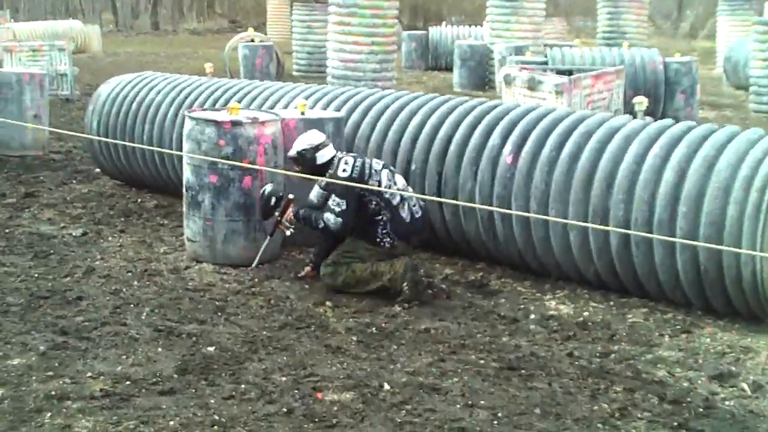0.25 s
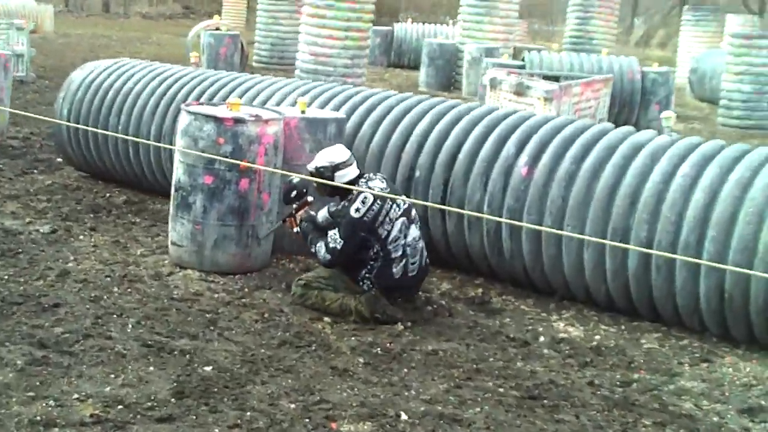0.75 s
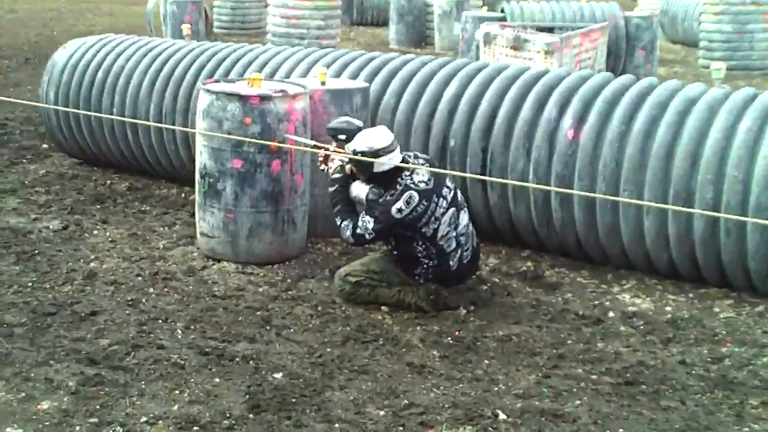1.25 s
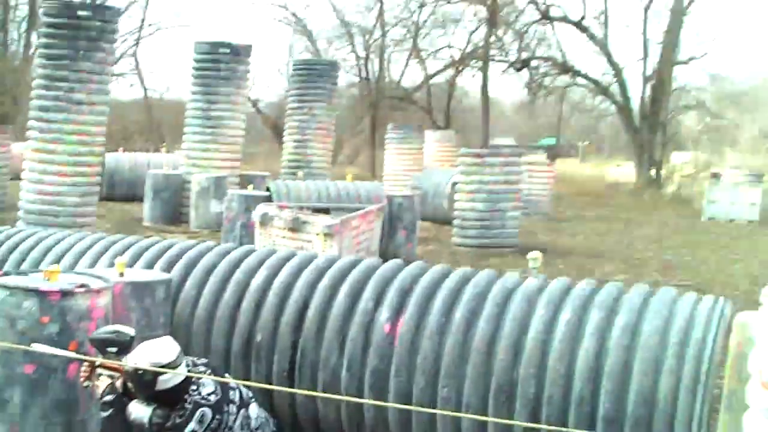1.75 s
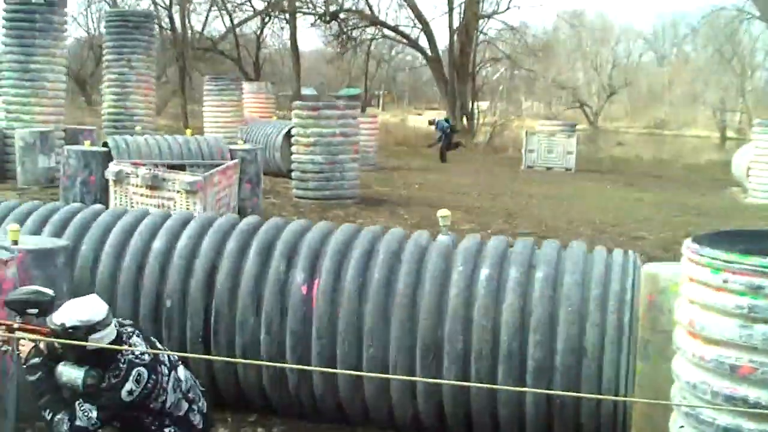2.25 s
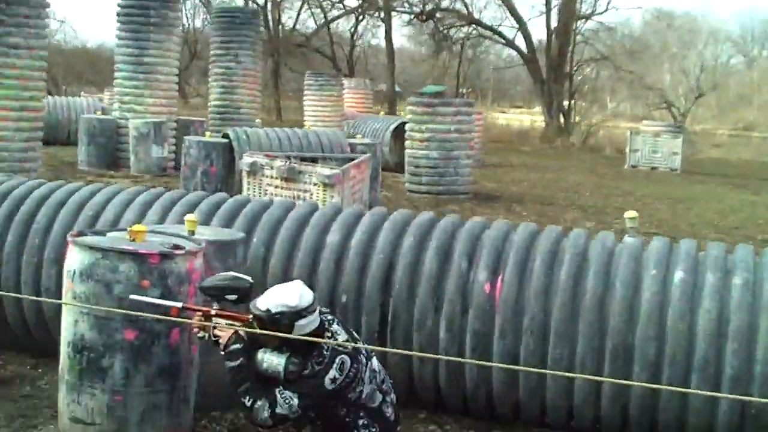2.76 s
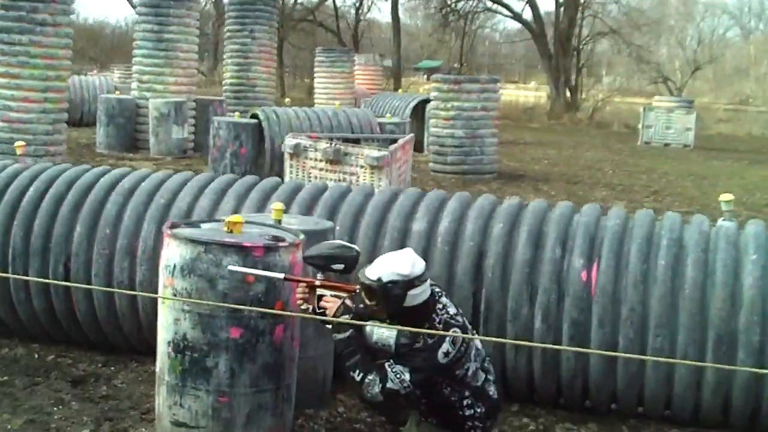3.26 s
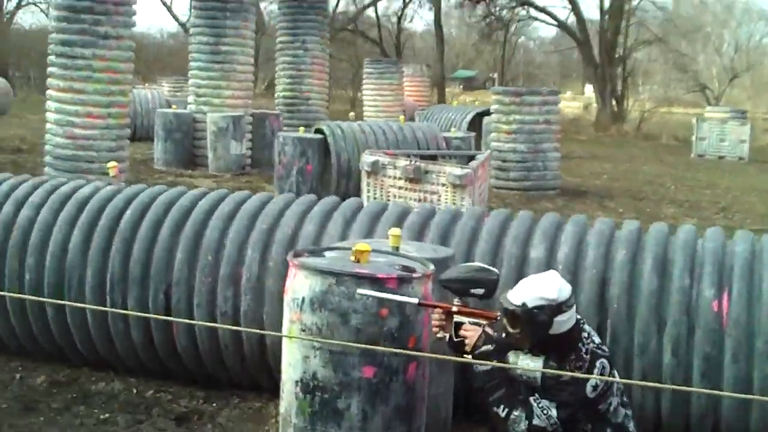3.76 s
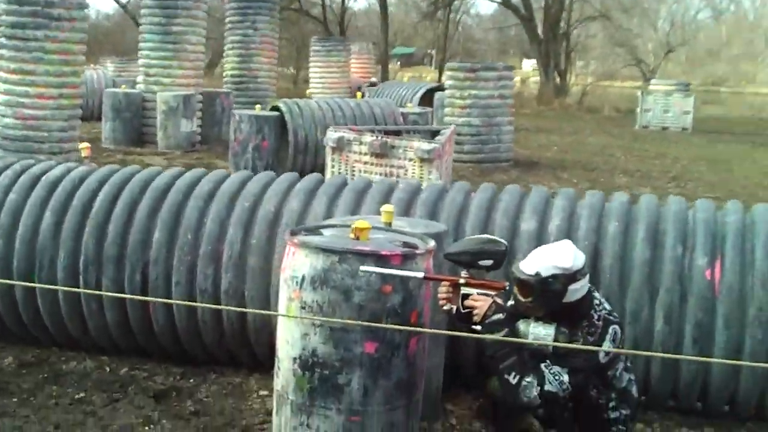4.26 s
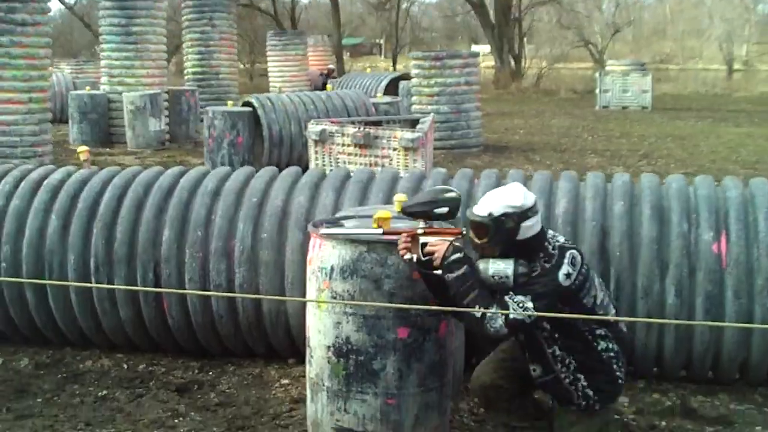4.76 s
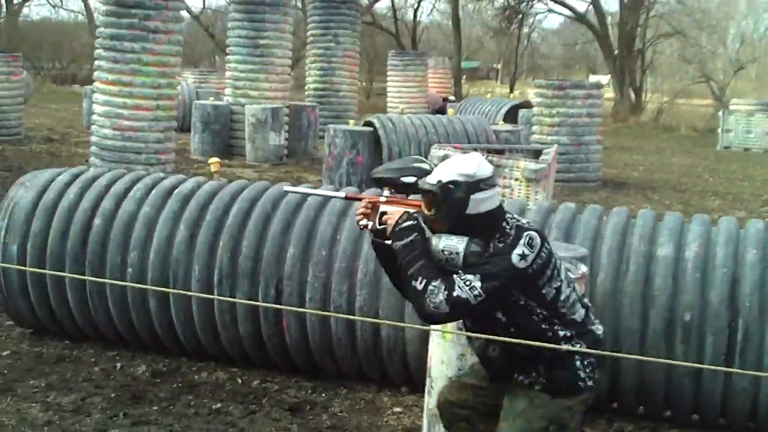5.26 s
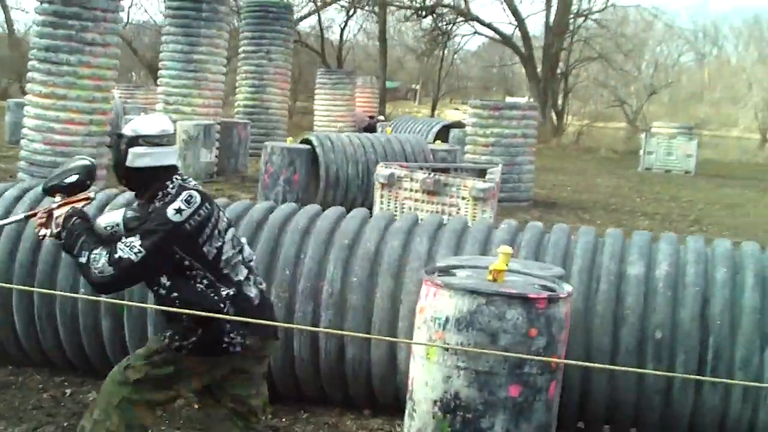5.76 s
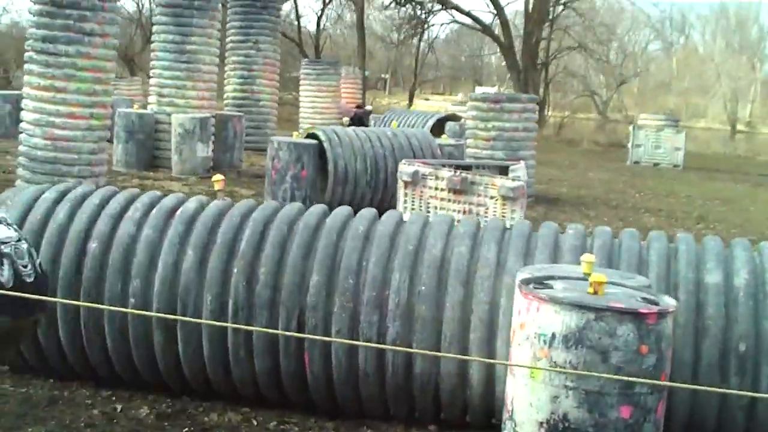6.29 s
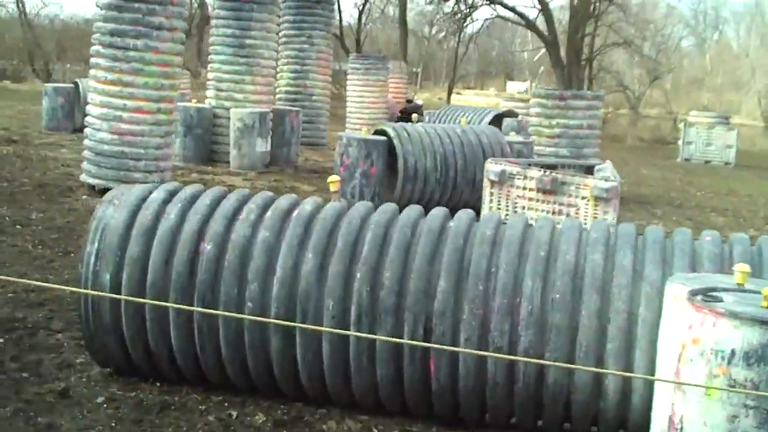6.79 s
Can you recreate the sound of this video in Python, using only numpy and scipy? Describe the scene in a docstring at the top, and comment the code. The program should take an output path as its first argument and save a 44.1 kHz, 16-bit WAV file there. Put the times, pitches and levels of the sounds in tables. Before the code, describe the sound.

Paintball markers crack outdoors in rapid bursts, near and far, with balls splatting on hollow plastic pipe over rustling, light wind and distant engine drone.

```python
"""A paintball marker fires bursts a few metres away: hammer click, blast pulse, ringing cavities, venting gas.
A second marker answers across the field as low swings with short noise cracks; balls burst as wet noise,
two of them on a ribbed plastic pipe that rings in modes. Trees scatter each bang as sparse, decaying returns.
Behind lie rustle, airy hiss and light wind as coloured noise, and a distant engine's wandering tones.
A small camera microphone adds hum, a gain control, a dull top and overload on peaks."""
import sys
import numpy as np
from scipy import signal
from scipy.io import wavfile
from scipy.ndimage import uniform_filter1d

SR = 44100
rng = np.random.default_rng(int(sys.argv[2]) if len(sys.argv) > 2 else 0)


def field_ratio(decibels):
    """Amplitude ratio for a level in dB (20 dB per decade); scalars and array-likes work."""
    return 10 ** (np.asarray(decibels, dtype=float) / 20)


def to_wav(sig):
    """Store sig (one row per channel, or 1-D mono) as 16-bit WAV at the path in sys.argv[1].

    Samples outside -1..1 are clipped; the rate is SR.
    """
    pcm = np.clip(np.atleast_2d(sig), -1, 1) * 32767
    pcm = np.round(pcm).astype(np.int16)
    wavfile.write(sys.argv[1], SR, pcm.T)  # frames by channels


N = 310023  # samples, about 7.03 s


def read(points, hz):
    """Spectral interpolation: levels joined on a log-frequency axis."""
    f, value = np.transpose(points)
    return np.interp(np.log(hz + 1), np.log(f + 1), value)


def evened(x):
    """Normalisation: scaled to rms 1."""
    return x / np.sqrt(np.mean(x ** 2) + 1e-20)


def follow(curve):
    """Envelope: the gain of a dB curve at every sample."""
    return field_ratio(np.interp(np.arange(N) / SR, *np.transpose(curve)))


def add(mix, s, sound):
    """Superposition: mixes a sound in at s seconds."""
    part = mix[max(round(s * SR), 0):][:len(sound)]
    part += sound[:len(part)]


def coloured(spectrum, size, patchy_db=0):
    """Spectral shaping: noise of rms 1 with a given spectrum and drifting patches."""
    frames = size // 256 + 5
    hz = np.fft.rfftfreq(1024, 1 / SR)
    a, b, patches = rng.standard_normal((frames, 513, 3)).T
    patches = uniform_filter1d(patches, size=12, axis=0)
    patches = evened(uniform_filter1d(patches, size=12, axis=1))
    depth_db = patchy_db * np.minimum(hz / 500, 1)[:, None]  # patches fade out below 500 Hz
    z = (a + 1j * b) * field_ratio(read(spectrum, hz)[:, None] + depth_db * patches)
    return evened(signal.istft(z, nperseg=1024, noverlap=768)[1][:size])


def ring(hz, t60, rise_s=.0001, size=4000):
    """Damped resonance: one mode that swells and dies exponentially."""
    t = np.arange(size) / SR
    return (1 - np.exp(-t / rise_s)) * field_ratio(-60 * t / t60) * np.sin(2 * np.pi * hz * t)


def puff(noise, t60, rise_s, bend=1):
    """Transient envelope: a quick swell, then decay; a larger bend holds on, then stops."""
    t = np.arange(len(noise)) / SR
    return noise * (1 - np.exp(-t / rise_s)) * field_ratio(-60 * (t / t60) ** bend)


def torn(noise, spread_db, smooth):
    """Amplitude modulation: noise made uneven by a random gain smoothed over some samples."""
    gain_db = spread_db * evened(uniform_filter1d(rng.standard_normal(len(noise)), size=smooth))
    return evened(noise * field_ratio(gain_db))


# Blasts of the near marker: t/s, level/dB
NEAR_SHOTS = [(2.0061, -0.5), (2.2425, -4), (2.3162, -5.5), (2.38, -3.5), (2.4494, -6), (2.511, -3),
              (3.8531, -3), (3.9150, -2.5), (4.0275, -1), (5.346, -6.5), (5.414, -4), (5.4797, -5.5),
              (5.5536, -5), (5.6121, -6.5)]
# Rest of the marker in each burst: from t/s, drum boom level/dB, barrel level/dB, barrel f/Hz, breech level/dB
BURST_POSES = [(1.9, -3, -6, 246.5, -17), (3.7, -4, -8.5, 288, -16), (5.2, -8.5, -4, 276.5, -14.5)]
# Modes struck by the hammer: f/Hz, relative level/dB, t60/s
HAMMER_MODES = [(860, 3, 0.022), (1340, -6.5, 0.02), (2990, -11, 0.066)]
# Returns of the blast off drum, pipe and ground: mean delay t/ms, relative level/dB
BLAST_BOUNCES = [(0.8, 4), (1.7, 8.5), (3.4, 6.5), (4.4, 6.5), (5.8, 5), (9.5, -12), (11, -30)]
# Modes of the hollow drum beside the muzzle: mean f/Hz, mean relative level/dB, t60/s
DRUM_MODES = [(77, -7, 0.082), (113, 5, 0.058), (167, -6, 0.08)]
# Spectrum of the venting gas: f/Hz, relative level/dB per Hz
GAS_SPECTRUM = [(180, -15.5), (300, -0.5), (546, -2.5), (858, -4.5), (1740, -10), (3160, -10.5),
                (3800, -14.5), (5370, -18), (7200, -32.5), (9360, -73.5), (15800, -120)]
# Gas at muzzle, its ground echo, bolt back, wall: delay t/ms, level re blast/dB, t60/s, abruptness of the end
GAS_PUFFS = [(0, -7.5, 0.023, 2.27), (10.4, -15, 0.031, 0.59), (18.5, -21, 0.022, 0.27),
             (28.1, -22.5, 0.031, 2.7)]


def near_marker():
    """Impulsive radiation: hammer click, blast pulse and reflections, ringing drum and barrel, turbulent gas."""
    lead_s = .0145  # the hammer falls before the blast
    spread = [0.17, 0.17, 7.7, 0.17]  # shot-to-shot spread: boom dB, barrel dB, barrel Hz, breech dB
    out = np.zeros(N)
    u = np.arange(200) / SR / 0.00025  # time in units of 0.25 ms
    blast = (1 - u) * np.exp(-u) * np.minimum(u * 2, 1)
    hammer = sum(field_ratio(db) * ring(hz, t60, 0.00025, size=3200) for hz, db, t60 in HAMMER_MODES)
    for s, blast_db in NEAR_SHOTS:
        pose = np.array([row for row in BURST_POSES if row[0] < s][-1][1:])
        boom_db, barrel_db, barrel_hz, breech_db = pose + spread * rng.standard_normal(4)
        # the jet tears unevenly; six stretches of it serve as separate puffs
        gas = torn(coloured(GAS_SPECTRUM, 19200), 4.05, 30).reshape(-1, 3200)

        click = hammer + field_ratio(-4) * puff(gas[-1], 0.12, 0.00093)
        add(out, s - lead_s, field_ratio(breech_db) * click)
        venting = puff(gas[-2], .053, .002, 3.6)
        add(out, s, field_ratio(breech_db - 2.5) * venting)  # the breech vents until the valve shuts

        add(out, s, field_ratio(blast_db) * blast)
        # the player never holds quite the same pose
        for (ms, db), (late, loud) in zip(BLAST_BOUNCES, rng.standard_normal((len(BLAST_BOUNCES), 2))):
            polarity = np.sign(loud + 0.18)
            add(out, s + (ms + 0.22 * late) / 1000, polarity * field_ratio(blast_db + 2.5 + db) * blast)

        boom = 0
        for (hz, db, t60), (shift, loud) in zip(DRUM_MODES, rng.standard_normal((len(DRUM_MODES), 2))):
            boom = boom + field_ratio(db + 2.0 * loud) * ring(hz * (1 + 0.072 * shift), t60, 0.01)
        body = field_ratio(boom_db) * boom + field_ratio(barrel_db) * ring(barrel_hz, 0.056, 0.00044)
        add(out, s, body)
        add(out, s + 0.03, field_ratio(-16.0) * body)  # a bunker further off returns the low body

        for noise, (ms, db, t60, bend) in zip(gas, GAS_PUFFS):
            add(out, s + ms / 1000, field_ratio(blast_db + db) * puff(noise, t60, 0.0027, bend))
    return out


# Shots of the far marker: t/s, thump level/dB, crack level/dB
FAR_SHOTS = [(0.0197, -6.5, -20), (0.1731, -7, -20), (0.3303, -7, -19.5), (0.4781, -7.5, -21),
             (2.334, -7, -26), (2.4872, -8.5, -19.5), (2.6121, -7, -23), (6.7498, -7, -18),
             (6.9005, -7.5, -18.5), (7.0246, -13.5, -27.5)]


def far_marker():
    """Propagation: distance rounds the blast into one low swing, and the ground returns thump and crack."""
    ground_s, ground_db, ground_crack_db = 0.0039, -11, -8.5
    bolt_s, bolt_db, bolt_t60_s = .0325, -6, 0.019
    crack_spectrum = [(300, -26.0), (1400, 7.5), (3000, -4.0), (5500, -8.5), (7000, -24.5)]  # f/Hz, level/dB
    out = np.zeros(N)
    swing = puff(np.sin(2 * np.pi * 360 * np.arange(800) / SR - .6), 0.006, 0.0012, 2.55)
    swing = swing + field_ratio(-21.5) * ring(249, 0.13, size=800)
    for s, thump_db, crack_db in FAR_SHOTS:
        direct, returned, bolt = coloured(crack_spectrum, 9000).reshape(3, -1)
        add(out, s, field_ratio(thump_db) * swing)
        add(out, s + ground_s, field_ratio(thump_db + ground_db) * swing)
        add(out, s, field_ratio(crack_db) * puff(direct, 0.011, 0.00016, 1.32))
        add(out, s + ground_s, field_ratio(crack_db + ground_crack_db) * puff(returned, 0.024, 0.00019, 1.46))
        # a short bright click follows, perhaps the bolt springing back
        click = puff(evened(np.diff(bolt)), bolt_t60_s, 0.00085)
        add(out, s + bolt_s, field_ratio(crack_db + bolt_db) * click)
    return out


# Balls bursting: t/s, splat level/dB, centre f/Hz, t60/s, hollow rumble level/dB
BALL_SPLATS = [(0.208, -27, 2470, 0.081, -37), (0.227, -31, 3000, .06, -48), (0.512, -32, 1780, .06, -37),
               (0.684, -13, 2000, 0.03, -21), (2.6239, -16.5, 1260, 0.025, -29),
               (2.9105, -9.5, 1730, 0.015, -31.5), (2.9602, -22.5, 3800, 0.03, -41),
               (4.5051, -18, 1450, 0.028, -33), (4.678, -31.5, 2960, 0.021, -43),
               (4.7209, -29.5, 3660, 0.039, -62), (5.7742, -13, 1550, 0.086, -21),
               (6.0556, -24.5, 4840, 0.015, -55)]


def splats():
    """Fracture noise: the shell breaks in a wet band of noise and a hollow rumble follows."""
    rumble_spectrum = [(150, -2), (400, -1.5), (700, -5.5), (2500, -14.5), (7000, -32.0)]  # f/Hz, level/dB
    out = np.zeros(N)
    for s, splat_db, hz, t60, rumble_db in BALL_SPLATS:
        burst = coloured([(hz / 7, -12), (hz, 0), (5500, -14), (7500, -28)], 4000)
        burst = torn(burst, 1.64, 40)  # shell bits and drops land unevenly
        rumble = coloured(rumble_spectrum, 16000)
        add(out, s, field_ratio(splat_db) * puff(burst, t60, 0.001))
        add(out, s + 0.003, field_ratio(rumble_db) * puff(rumble, 0.19, 0.0014))
    return out


# Balls that land on the pipe: t/s, snap level/dB
PIPE_SNAPS = [(0.684, -7), (5.7757, 4)]
# Near wall, far wall and next rib ring after the snap: delay t/ms, level re snap/dB
PIPE_ANSWERS = [(3.6, -10.5), (7.6, -14.5), (14.5, -21)]
# Modes of the ribbed plastic wall: f/Hz, relative level/dB, t60/s
PIPE_MODES = [(910, 2.5, 0.075), (1004, 2, 0.021), (1170, -9, .028), (1625, -0.5, 0.041), (2700, -9, 0.036)]


def pipe_knocks():
    """Modal excitation: the pipe wall snaps where a ball lands, then rings a moment later."""
    out = np.zeros(N)
    wall = sum(field_ratio(db) * ring(hz, t60, 0.00065) for hz, db, t60 in PIPE_MODES)
    for s, snap_db in PIPE_SNAPS:
        add(out, s, field_ratio(snap_db) * ring(1135, 0.015, 0.00053))
        for ms, db in PIPE_ANSWERS:
            add(out, s + ms / 1000, field_ratio(snap_db + db) * wall)
    return out


# Decay of the trees' scattering: f/Hz, t60/s
TREE_DECAY = [(150, 0.48), (500, 0.4), (1500, 0.37), (4000, 0.41), (7000, 0.2)]


def trees(x):
    """Scattering: convolution with sparse returns, each band dying at its own speed."""
    taps = np.zeros(SR)
    at = np.arange(1700, SR - 22, 22)  # one return of either sign in every 22 samples
    taps[at + rng.integers(0, 22, len(at))] = rng.choice([-1., 1.], len(at))
    hz, t, z = signal.stft(taps, SR, nperseg=256)
    t60 = np.clip(read(TREE_DECAY, hz), .05, 3)[:, None]
    tail = signal.istft(z * field_ratio(-60 * t / t60), SR, nperseg=256)[1]
    return signal.fftconvolve(x, tail / np.linalg.norm(tail))[:N]


# Leaves and scuffing boots, before the crackle: t/s, level/dB
RUSTLE_LEVEL = [(0, -47), (.43, -44), (.75, -39), (1.1, -49), (1.47, -42), (1.7, -46.5), (2.2, -47.5),
                (2.8, -41.5), (3.15, -47), (4.15, -49), (4.35, -43.5), (4.52, -47.5), (5.17, -47),
                (5.29, -39.5), (5.9, -37), (6.3, -40.5), (6.4, -46.5), (7.03, -42)]
# Spectrum of the rustle: f/Hz, relative level/dB per Hz
RUSTLE_SPECTRUM = [(150, -37.5), (250, -7.5), (369, -0.5), (701, -3.5), (1180, -5.5), (1890, -10),
                   (4610, -21), (7000, -42.5), (9100, -86), (15400, -120)]


def rustle():
    """Friction noise: leaves and boots, with twigs and grit crackling as random gain bumps."""
    ticks_per_s, mean_size = 18.0, 0.6
    sizes = (rng.random(N) < ticks_per_s / SR) * rng.exponential(mean_size, N)
    ticks = signal.oaconvolve(sizes, np.hanning(350))[:N]
    return follow(RUSTLE_LEVEL) * (1 + ticks) * coloured(RUSTLE_SPECTRUM, N, patchy_db=2.66)


def waver(hz, width_hz, steady):
    """Narrow-band noise: a tone of rms 1 whose strength and phase wander."""
    r = np.exp(-np.pi * width_hz / SR)
    drift = signal.lfilter([1], [1, -2 * r, r * r], rng.standard_normal((N, 2)) @ [1, 1j])
    phasor = steady + drift / abs(drift).mean()
    return evened((phasor * np.exp(2j * np.pi * hz * np.arange(N) / SR)).real)


# Engine tones swelling with the wind: t/s, firing tone level/dB, overtones relative level/dB
ENGINE_LEVELS = [(0, -49, -54.5), (1.111, -42, -69.5), (1.66, -62, -58), (1.9, -50, -48.5),
                 (2.72, -49.5, -53), (2.9, -64, -52), (3.3, -54, -62), (3.45, -44.5, -60), (4.2, -43, -52),
                 (4.58, -52, -66.5), (4.8, -47, -49), (6.23, -44, -51), (6.58, -46.5, -55),
                 (7.03, -41.5, -43.5)]
# A second, higher tone: t/s, level/dB
NEIGHBOUR_LEVEL = [(0, -45), (.62, -41.5), (1.45, -46.5), (1.9, -50.5), (2.72, -39), (2.9, -58),
                   (3.3, -50.5), (3.6, -61.5), (4.58, -53), (4.8, -57), (6.23, -47), (7.03, -50.5)]


def engine():
    """Beating: the firing tone interferes with a neighbour; two overtones ride above."""
    firing_hz, neighbour_hz = 93.7, 109.3
    s, firing_db, over_db = np.transpose(ENGINE_LEVELS)
    firing = follow([*zip(s, firing_db)]) * waver(firing_hz, 4.4, 5.1)
    neighbour = follow(NEIGHBOUR_LEVEL) * waver(neighbour_hz, 5.7, 0.61)
    tops = waver(2 * firing_hz, 4.8, 1.9) + field_ratio(-4.0) * waver(4 * firing_hz, 5.6, 0.65)
    return firing + neighbour + follow([*zip(s, over_db)]) * tops


# Swells of an airy hiss: middle t/s, length t/s, level/dB
HISS_SWELLS = [(0.518, 0.16, -44.5), (.85, 0.26, -47), (1.42, 0.11, -56), (1.855, 0.49, -50.5),
               (3.7, 0.36, -55), (4.308, 0.074, -48), (5.95, 0.12, -52), (6.6, 0.19, -49.5)]
# Spectrum of the hiss: f/Hz, relative level/dB per Hz
HISS_SPECTRUM = [(900, -37.5), (1350, 1.5), (1600, 5), (2000, 2), (3200, -27), (7000, -42)]


def airy_hiss():
    """Gaussian envelopes: each swell of band noise rises and falls like a bell curve."""
    t = np.arange(N) / SR
    swells = sum(field_ratio(db) * np.exp(-(2 * (t - s) / length) ** 2) for s, length, db in HISS_SWELLS)
    return swells * coloured(HISS_SPECTRUM, N, patchy_db=1.0)


# Spectrum of the light wind and open air: f/Hz, relative level/dB per Hz
AIR_SPECTRUM = [(21, -29), (36, 1), (70, -6.5), (110, -11.5), (157, -8), (326, -15), (381, -23.5),
                (456, -22.5), (1890, -33), (4830, -38.5), (6450, -52.5), (7370, -36.5), (9580, -102),
                (16200, -120)]


def open_air():
    """Broadband background noise: a steady bed whose spectrum drifts in patches."""
    return field_ratio(-42.5) * coloured(AIR_SPECTRUM, N, patchy_db=3.5)


def scene():
    """Superposition: direct bangs and their scattered echo over rustle, engine, hiss and wind."""
    near, far, wet, knock = near_marker(), far_marker(), splats(), pipe_knocks()
    echo = trees(field_ratio(-24) * near + field_ratio(-25.0) * far + field_ratio(-20) * wet + field_ratio(-26) * knock)
    background = rustle() + engine() + airy_hiss() + open_air()
    return (near + far + wet + knock + echo + background)[None]


def band_limit(x):
    """A steep low-pass at the top of the band."""
    return signal.sosfilt(signal.butter(12, 7520, fs=SR, output="sos"), x)


def record(dry):
    """Compression and saturation: camera hum, gain that ducks after each bang, a steep treble limit, overload."""
    edge_hz, hum_hz, hum_db = 6720, 25.3, -40.5
    threshold_db, release_db_per_s = -10.5, 15.6
    x = dry + field_ratio(hum_db) * waver(hum_hz, 1.1, 3.1)
    power_db = 10 * np.log10(abs(uniform_filter1d(x[0] ** 2, 300)) + 1e-12)
    fall_db = np.arange(N) * release_db_per_s / SR
    held_db = np.maximum.accumulate(power_db + fall_db) - fall_db  # peaks hold, then sink steadily
    over_db = np.maximum(held_db - threshold_db, 0)
    late_db = signal.lfilter([1 / 500], [1, 1 / 500 - 1], over_db)  # the control lags the attack
    ducked = x / field_ratio(.5 * late_db)  # half the excess is taken off
    lowpass = signal.firwin(127, edge_hz, window=("kaiser", 9), fs=SR)
    dull = signal.oaconvolve(ducked, lowpass[None], "same")
    overloaded = np.clip(1.266 * np.tanh(dull / 1.029), -1, 1)
    return band_limit(overloaded)


dry = scene()
out = record(dry)
to_wav(out)
```